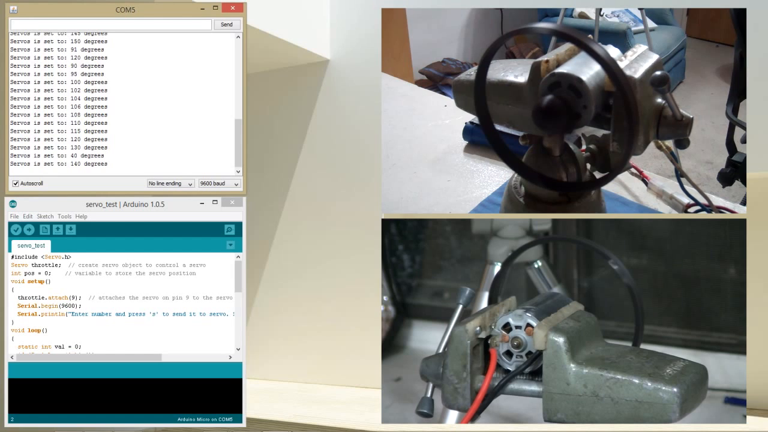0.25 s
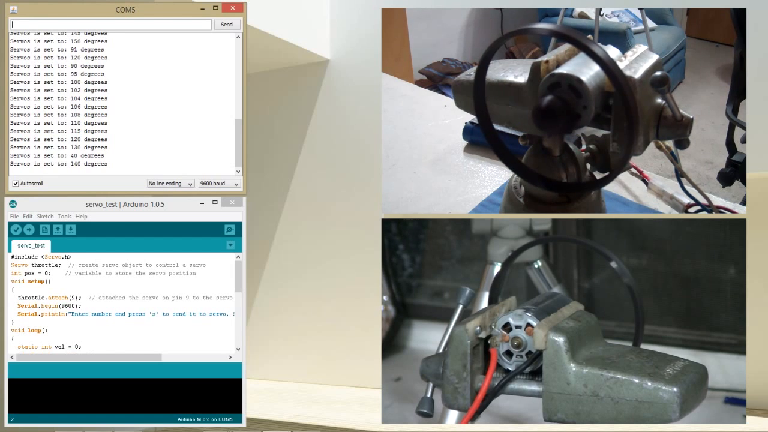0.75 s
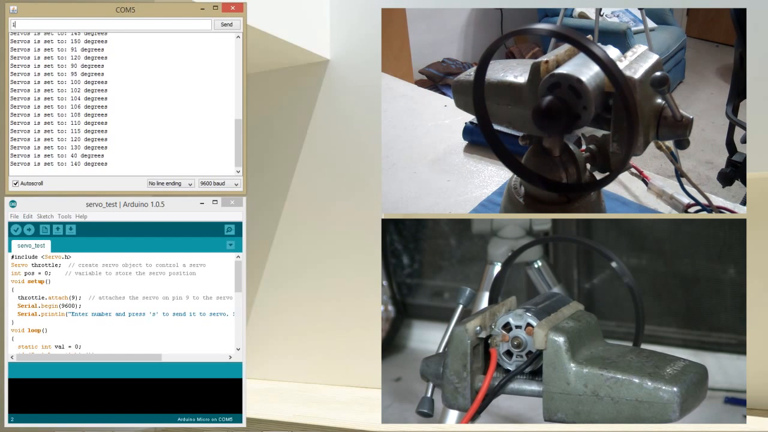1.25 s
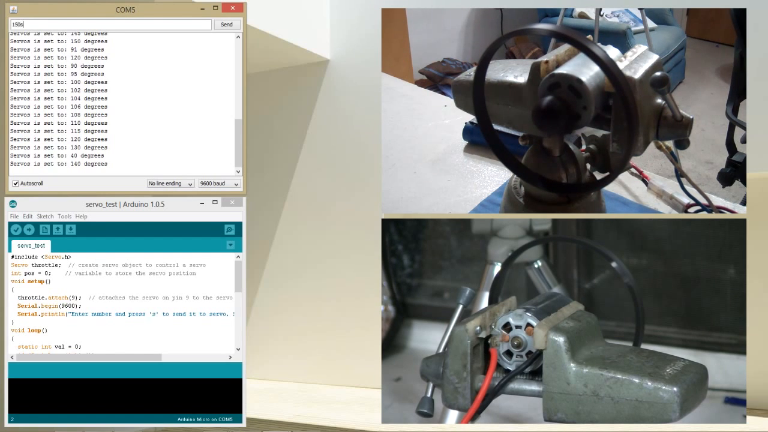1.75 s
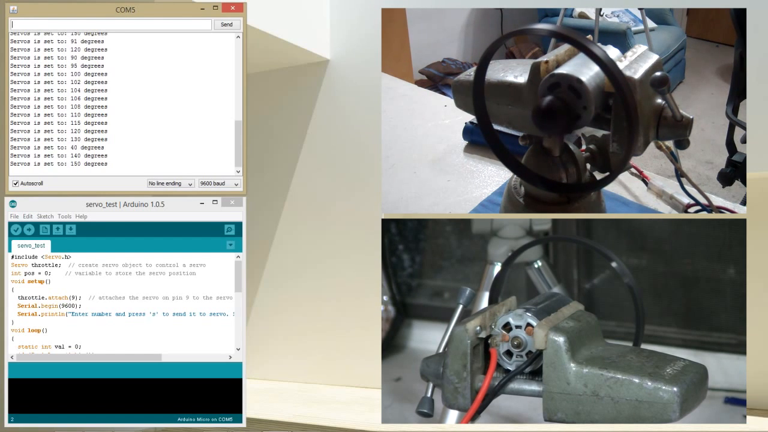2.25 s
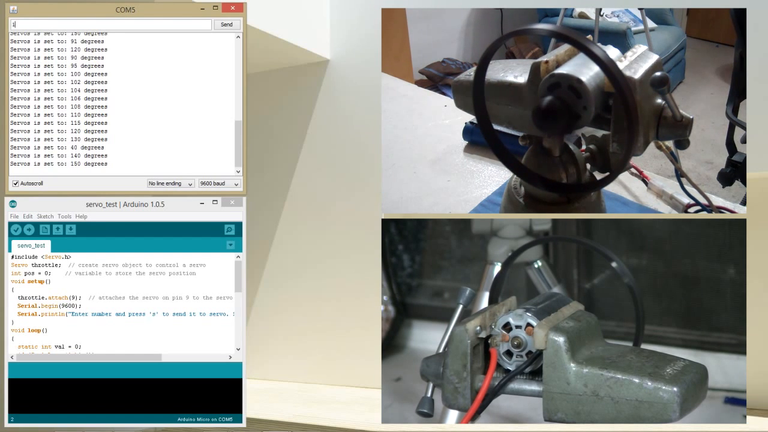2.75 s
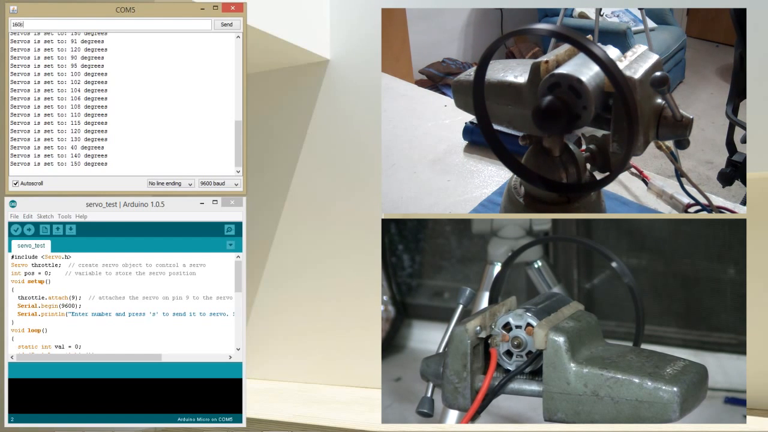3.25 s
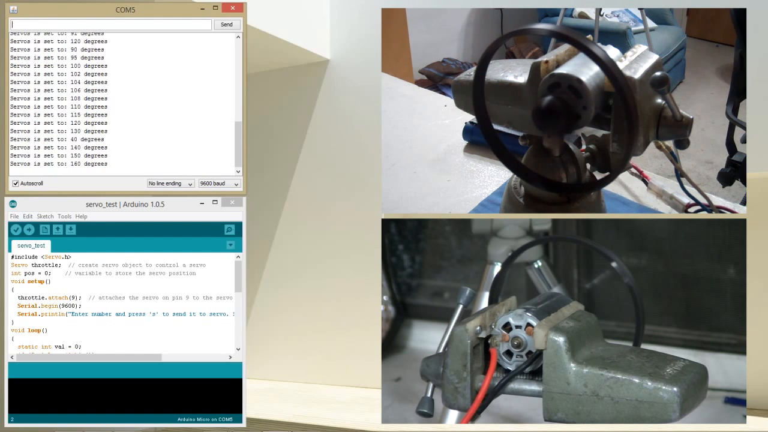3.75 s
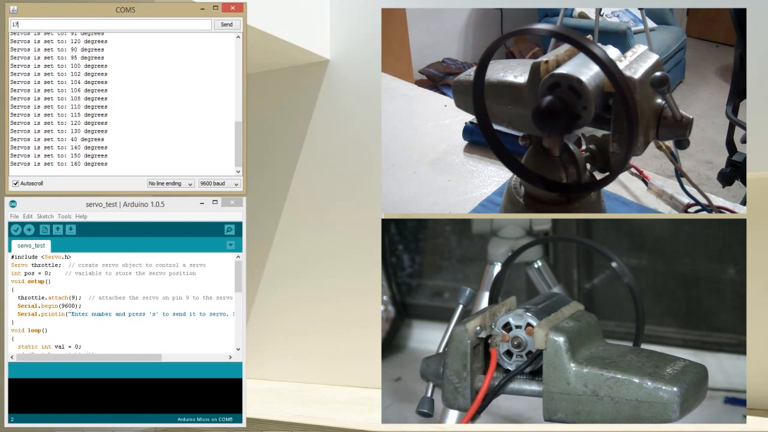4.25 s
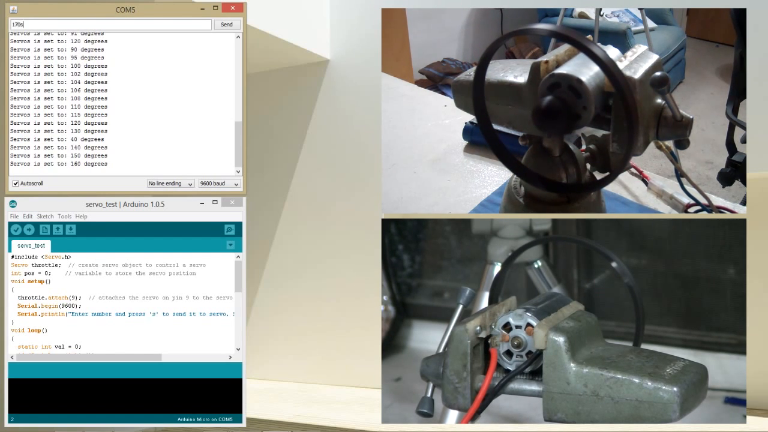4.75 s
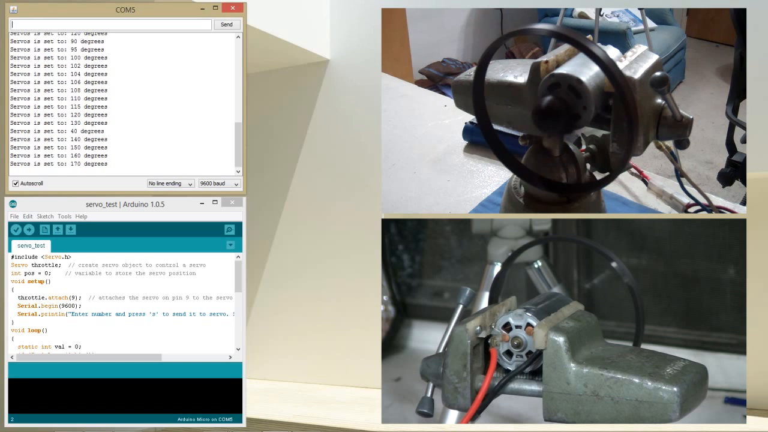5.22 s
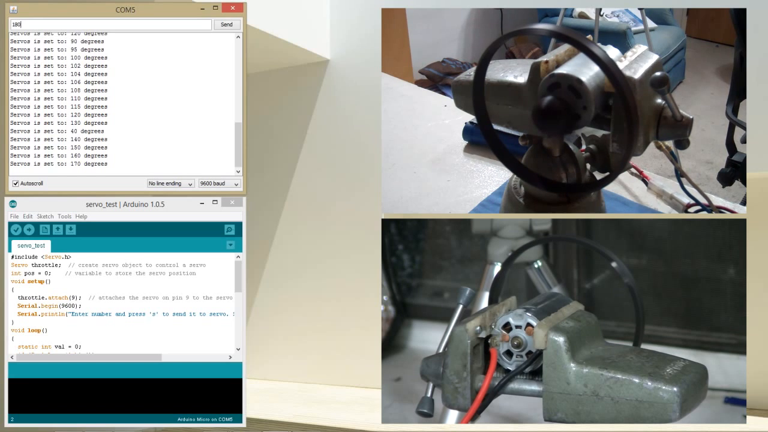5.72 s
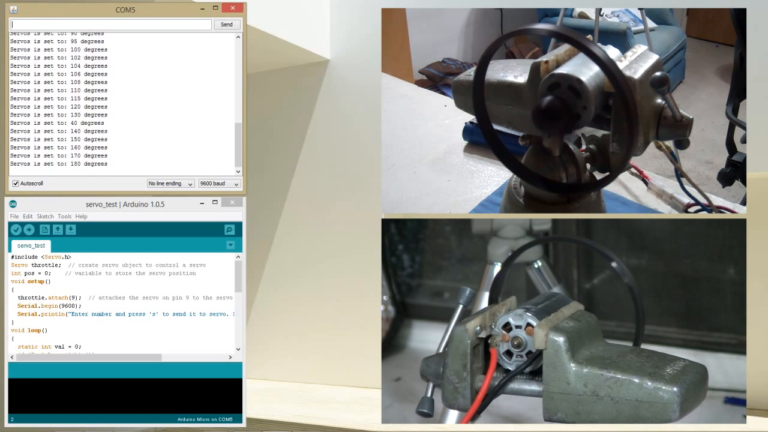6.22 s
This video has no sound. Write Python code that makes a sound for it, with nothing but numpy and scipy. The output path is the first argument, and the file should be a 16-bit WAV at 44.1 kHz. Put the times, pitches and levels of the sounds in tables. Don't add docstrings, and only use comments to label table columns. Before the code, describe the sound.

A small electric ducted fan clamped in a bench vice slows quickly with a gritty rub and steady high whine, stopping within half a second. It immediately reverses, swells over about a second into a bright rushing roar with whistles and shaft tones, then holds steady. Soft key presses and a leaning hand thump through the desk. Small room, close, nearly mono microphone.

```python
import sys
import numpy as np
from scipy import signal
from scipy.fft import rfft, irfft, next_fast_len
from scipy.io import wavfile
from scipy.ndimage import uniform_filter1d, map_coordinates

SR = 44100
rng = np.random.default_rng(int(sys.argv[2]) if len(sys.argv) > 2 else 0)


def ratio(d):
    e = np.asarray(d, float) / 20
    return 10 ** e


def wav_out(sig):
    wavfile.write(sys.argv[1], SR, np.round(np.clip(np.atleast_2d(sig).T, -1, 1) * 32767).astype(np.int16))


N = 285768


def unit(x):
    return x / np.sqrt(np.mean(x ** 2) + 1e-20)


def along(points, hz):
    f, v = np.transpose(points)
    return np.interp(np.log(hz + 1), np.log(f + 1), v)


def wobble(rate):
    knots = rng.standard_normal(int(N * rate / SR) + 4)
    return map_coordinates(knots, [np.arange(N) * rate / SR])


def filtered(x, response):
    m = next_fast_len(N + SR // 2)
    return irfft(rfft(x, m) * response(np.fft.rfftfreq(m, 1 / SR)), m)[..., :N]


def peak(hz, centre_hz, width_hz):
    return 1 / (1 + (2 * (hz - centre_hz) / width_hz) ** 2)


def band(centre_hz, width_hz):
    return unit(filtered(rng.standard_normal(N), lambda hz: peak(hz, centre_hz, width_hz)))


def noise(spectrum, patchy_db):
    z = signal.stft(rng.standard_normal(N), nperseg=512)[2]
    field = uniform_filter1d(rng.standard_normal(z.shape), size=8, axis=0)
    field = uniform_filter1d(field, size=8, axis=1)
    x = signal.istft(z * ratio(patchy_db * unit(field)), nperseg=512)[1][:N]
    return unit(filtered(x, lambda hz: ratio(along(spectrum, hz))))


# (full speed [Hz], standstill [s], run-up time constant [s], braking rate [Hz/s])
ROTOR = (244.7, .362, .3, 600)
FULL_HZ, STOP_S, RUN_UP_S, BRAKE_RATE = ROTOR
# (onset [s], rise of the speed until then [Hz/s], sag of the speed half-way down [0-1])
BRAKE = (.05, 351, .2)


def speed():
    start_s, rise, sag = BRAKE
    brake_s = STOP_S - start_s
    t = np.arange(N) / SR - STOP_S
    left = -t / brake_s
    before = 1 - rise * (left - 1) / BRAKE_RATE
    braking = left * (1 - 4 * sag * left * (1 - left))
    down = BRAKE_RATE * brake_s * np.where(left > 1, before, braking)
    up = FULL_HZ * (1 - np.exp(-np.abs(t) / RUN_UP_S))
    return np.where(t < 0, down, up) * (1 + 0.001008 * wobble(2.5))


def forward():
    return np.arange(N) > STOP_S * SR


# (frequency [Hz], level [dB per Hz])
RUSH_COLOUR = [(90, -44), (160, -31), (240, -28.5), (400, -31.5), (650, -19.5), (900, -12), (1400, -7),
               (2000, -7.5), (2700, -8.5), (3600, -6), (5000, -10), (6300, -13), (8500, -25.5),
               (11000, -36.5), (18000, -120)]
# (frequency [Hz], level [dB per Hz])
HISS_COLOUR = [(4120, -11), (7000, -6), (8350, -6), (10300, -4.5), (15500, -24)]
# (frequency [Hz], width [Hz], boost [dB])
DUCT = [(224.3, 16, 15), (268.4, 13, 12), (390, 33, 5.5), (540, 112, 8), (632, 45, -8.5), (801, 36, 6),
        (985, 74, 3.5), (1393, 48, -28), (1460, 30, 7.5), (1473, 18, -20), (1939, 50, 3.5), (2070, 25, 1.5),
        (2270, 18, -4.5), (3216, 120, 1), (4080, 39, 0.5)]
TREBLE_DB, BRAKE_TREBLE_DB = -11, -12
STALL_DB, STALL_SLOPE_DB, ATTACHED = 3.5, 18, 0.68
DULL_HZ, DULL_DB = 3620, -3.5


def rush(share):
    stall_db = np.clip(STALL_SLOPE_DB * (ATTACHED - share), 0, STALL_DB)
    hiss_db = np.where(forward(), TREBLE_DB + stall_db, BRAKE_TREBLE_DB + stall_db / 2)

    def duct(hz):
        return np.prod([1 + (ratio(db) - 1) * peak(hz, c, w) for c, w, db in DUCT], axis=0)

    body = ratio(4) * unit(filtered(noise(RUSH_COLOUR, patchy_db=-0.1), duct))
    top = filtered(body, lambda hz: 1 / (1 + (DULL_HZ / (hz + 1)) ** 6))
    dulling = ratio(DULL_DB * (1 - share) * forward()) - 1
    return body + dulling * top + ratio(hiss_db) * noise(HISS_COLOUR, patchy_db=0.9)


# (frequency [Hz], width [Hz], level re rush [dB])
BACKWASH = (3000, 910, -4)


def backwash():
    hz, width_hz, db = BACKWASH
    return ratio(db) * ~forward() * band(hz, width_hz)


# (multiple of shaft rate, width [Hz], level re rush [dB])
WHISTLE = [
    (6.75, 115, -3),
    (13.15, 88, -11),
]


def whistles(turns):
    grip = np.clip(2.4 * turns / FULL_HZ - .8, 0, 1)
    out = np.zeros(N)
    for multiple, width_hz, db in WHISTLE:
        slow = filtered(rng.standard_normal((2, N)), lambda hz: 1 / (1 + (hz / width_hz) ** 2))
        angle = 2 * np.pi * multiple * np.cumsum(turns) / SR
        out += ratio(db) * grip * unit(slow[0] * np.cos(angle) + slow[1] * np.sin(angle))
    return out


# (frequency [Hz], width [Hz], level re rush [dB])
PIPE = (988, 70, -10.5)


def pipe(share):
    hz, width_hz, db = PIPE
    return ratio(db + 4.2 * wobble(3.99)) * share ** 0.98 * band(hz, width_hz)


RUSH_DB, RUSH_POWER = -20, 2.1
STILL = .06


def air(turns):
    share = turns / FULL_HZ
    gust_db = .5 * wobble(6) + 0.22 * wobble(40)
    level = np.hypot(share, STILL) ** RUSH_POWER * ratio(RUSH_DB + gust_db)
    return level * (rush(share) + backwash() + whistles(turns) + pipe(share))


# (frequency [Hz], width [Hz], level [dB])
FRAME = [(541, 63, 1.5), (757, 166, -0.5), (1130, 460, -6.5), (1710, 270, 1.5), (3940, 150, -13),
         (4780, 120, -14), (6250, 250, -11)]
GRIND_DB, GRIND_POWER, SETTLE_DB = -25, 1.16, 13.5


def frame(turns):
    share = turns / FULL_HZ
    level = share ** GRIND_POWER * ratio(GRIND_DB - SETTLE_DB * share ** 4 * forward())

    def modes(hz):
        return sum(ratio(db) * peak(hz, c, w) for c, w, db in FRAME)

    return level * ratio(1.4 * wobble(30)) * unit(filtered(rng.standard_normal(N), modes))


# (multiple of base, level [dB rms])
DRIVE = [(2, -66), (3, -69), (4, -59), (5, -65), (6, -74), (7, -59), (8, -78), (9, -80)]
DRIVE_HZ, DRIVE_OFF_S, DRIVE_T60 = 976.7, .345, .14


def drive():
    t = np.arange(N) / SR
    tones = np.zeros(N)
    for k, db in DRIVE:
        phase = 2 * np.pi * (k * DRIVE_HZ * t + rng.random())
        tones += ratio(db + 5 + 2.8 * wobble(26)) * np.sin(phase)
    return ratio(-60 * np.clip(t - DRIVE_OFF_S, 0, None) / DRIVE_T60) * tones


# (frequency [Hz], level [dB per Hz])
QUIET = [(60, -14), (160, -7), (400, -5), (600, -18), (1200, -28), (3000, -36), (8000, -40), (15000, -44)]
QUIET_DB = -55


def idle(patchy_db):
    return ratio(QUIET_DB) * noise(QUIET, patchy_db)


# (time [s], desk mode level [dB], panel mode level [dB])
KEYS = [(.03, -51, -39), (0.179, -58, -43), (.3, -63, -54), (.61, -54, -55), (1.424, -64, -42),
        (1.703, -53, -37), (2.125, -46, -57), (2.39, -52, -43), (3.021, -70, -40), (3.118, -35, -36),
        (3.483, -34.5, -34), (3.79, -43, -29.5), (4.208, -32, -39), (4.599, -41, -41), (4.945, -29, -36.5),
        (5.242, -34, -28.5), (5.731, -29, -36), (6.052, -35, -38), (6.299, -38, -52)]
# (frequency [Hz], t60 [s], beat [Hz])
DESK = [
    (53, 0.68, 4.1),
    (127, 0.51, 9.8),
]


def keys():
    out, t = np.zeros(N + SR), np.arange(SR // 2) / SR
    press = (1 - np.exp(-t / 0.0065)) ** 2
    for s, *levels in KEYS:
        for (hz, t60, beat_hz), db in zip(DESK, levels):
            beat = np.cos(np.pi * beat_hz * (t - .025))
            ring = ratio(db + 5.5 - 60 * t / t60) * press * beat
            out[round(s * SR):][:len(t)] -= ring * np.sin(2 * np.pi * hz * t)
    return out[:N]


# (time [s], rumble level [dB])
LEANS = [(.05, -52), (.32, -55), (.55, -57), (.66, -57), (.8, -54), (1.72, -50), (1.9, -40), (2.1, -49),
         (2.33, -49), (3.3, -52), (3.7, -45), (4.3, -51), (4.68, -46), (5.15, -50), (5.8, -53), (6.15, -50)]
# (frequency [Hz], level [dB per Hz])
LOWS = [(12, -2), (25, 2.5), (40, -6), (53, -7), (70, -5), (110, -24), (200, -60)]
# (frequency [Hz], level [dB per Hz])
PANEL = [(60, -36), (110, -6), (127, 9), (145, -24), (250, -52)]
LEAN_RISE_S, LEAN_T60 = 0.062, 0.51
RUMBLE_DB, PANEL_DB = -70, -53.5


def rumble(turns):
    clock, share = np.arange(N) / SR, turns / FULL_HZ
    leans = np.zeros(N)
    for s, db in LEANS:
        swell = np.exp(np.clip(clock - s, None, 0) / LEAN_RISE_S)
        leans += swell * ratio(db - 60 * np.clip(clock - s, 0, None) / LEAN_T60)
    loose = (leans + share * ratio(RUMBLE_DB)) * ratio(7.5 + 1.2 * wobble(7.9))
    panel = share * ratio(PANEL_DB + 1.8 * wobble(6.4))
    return loose * noise(LOWS, patchy_db=2.0) + panel * noise(PANEL, patchy_db=-2.0)


def room(x, t60):
    t = np.arange(SR // 2) / SR
    tail = rng.standard_normal(len(t)) * ratio(-60 * t / t60) * (t > .004)
    return signal.fftconvolve(x, tail / np.linalg.norm(tail))[:N]


WIDE_DB, NARROWS_DB = -3, 33
SLOW_WIDE_DB, WIDENS_DB = 5, 38


def width_db(turns):
    share = turns / FULL_HZ
    running = np.minimum(SLOW_WIDE_DB + WIDENS_DB * share, WIDE_DB + NARROWS_DB * (1 - share))
    return np.where(forward(), running, SLOW_WIDE_DB)


# (multiple of shaft rate, level at full speed [dB rms])
SHAFT = [(1, -51), (2, -43.5), (5, -41.5), (17, -41.5), (22, -45), (48, -62)]
# (shaft rate [Hz], gain [dB])
CLAMP = [(120, 4), (190, 3), (215, 11), (225, 5), (238, 10), (243, 0)]
# (shaft rate [Hz], gain [dB])
CLAMP_TWICE = [(165, -12), (180, 1), (200, 3), (211, -7), (221, 2), (231, -8), (241, -5), (244, 0)]


def rotor(turns):
    angle = 2 * np.pi * np.cumsum(turns) / SR
    tones = []
    for k, db in SHAFT:
        level = np.sqrt(2) * ratio(db + 1.04 * wobble(9))
        tones.append(level * np.sin(k * angle + 0.2 * wobble(8.8)))
    tones[0] *= ratio(along(CLAMP, turns))
    tones[1] *= ratio(along(CLAMP_TWICE, turns))
    return (turns / FULL_HZ) ** 2 * forward() * sum(tones)


# (frequency [Hz], side re mid [dB])
SIDE_COLOUR = [(60, -36), (300, -43), (500, -29.5), (1200, -40.5), (2700, -25), (4500, -23.5), (6000, -24),
               (8500, -12.5), (11000, -17), (15000, -23)]
MIC_HISS_DB, IDLE_SIDE_DB = -72, -20


def scene():
    turns = speed()
    fan = air(turns) + frame(turns)
    echo = ratio(-10) * room(fan, t60=.12)
    echo = filtered(echo, lambda hz: 1 / (1 + (1100 / (hz + 1)) ** 6 + (hz / 5000) ** 4))
    mid = ratio(0.13) * fan + echo + drive() + rotor(turns)
    mid += keys() + rumble(turns)
    mid += idle(patchy_db=3.0) + ratio(MIC_HISS_DB) * rng.standard_normal(N)
    side = filtered(room(mid, t60=0.067), lambda hz: ratio(along(SIDE_COLOUR, hz)))
    side = side * ratio(width_db(turns)) + ratio(IDLE_SIDE_DB) * idle(patchy_db=6.0)
    return np.array([mid + side, mid - side])


def top_cut(x):
    return signal.sosfilt(signal.butter(12, 15630, fs=SR, output="sos"), x)


def record(dry):
    mix = filtered(dry, lambda hz: hz < 15700)
    return top_cut(mix)


dry = scene()
out = record(dry)
wav_out(out)
```